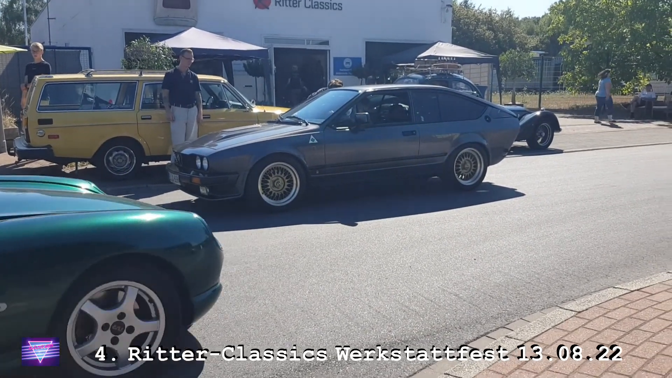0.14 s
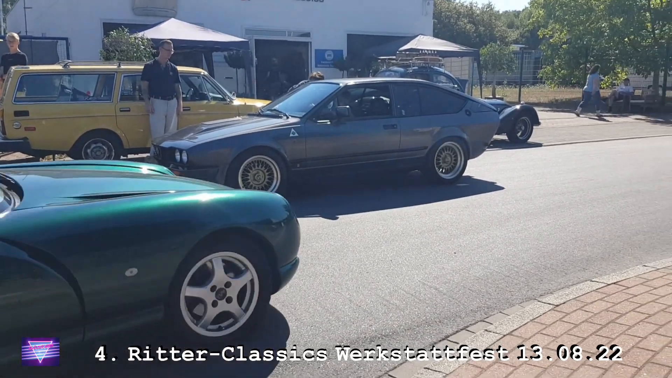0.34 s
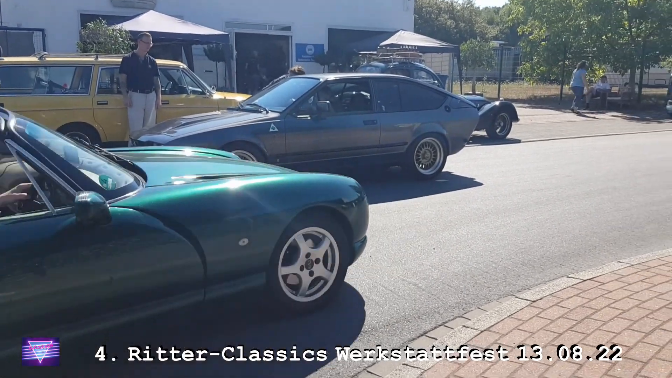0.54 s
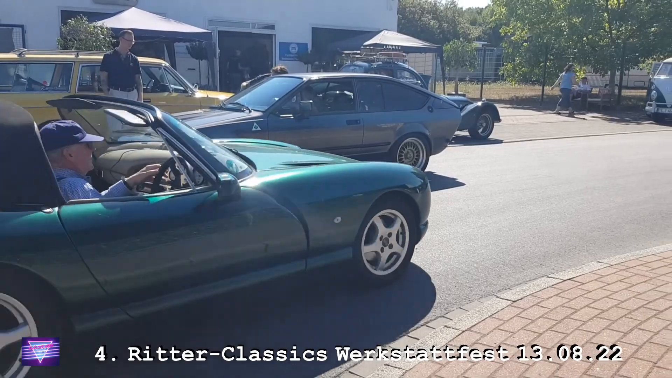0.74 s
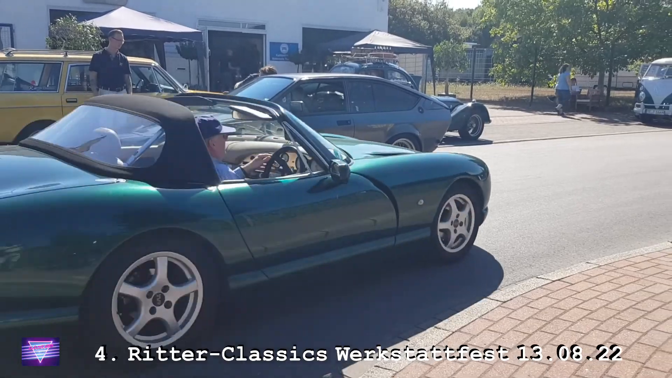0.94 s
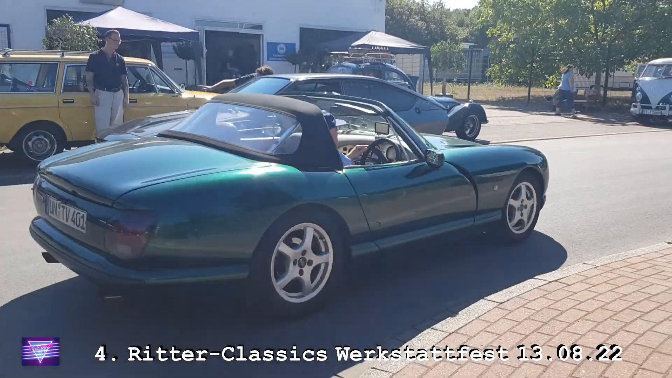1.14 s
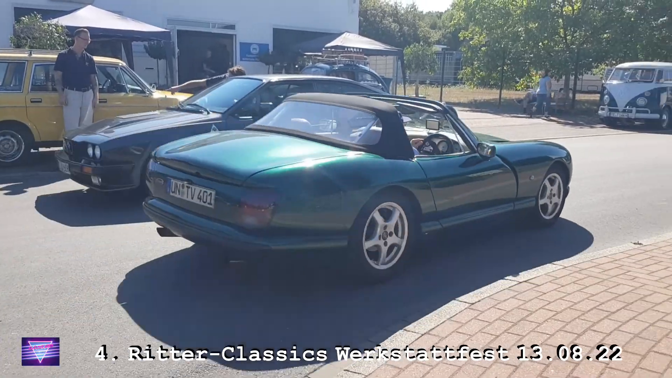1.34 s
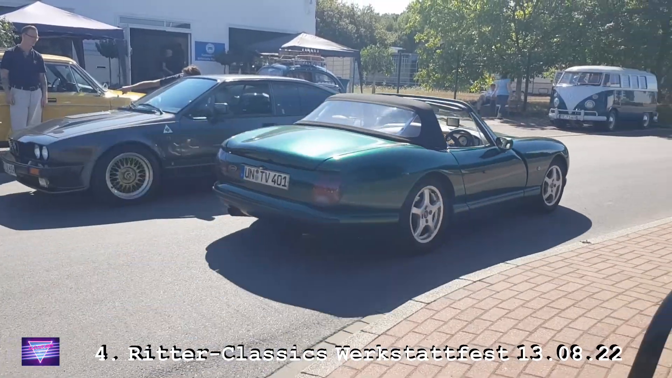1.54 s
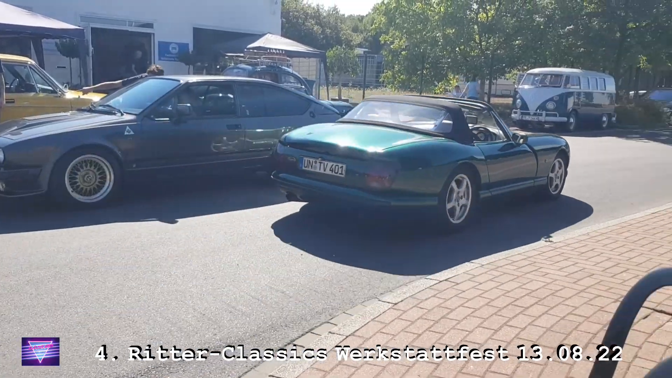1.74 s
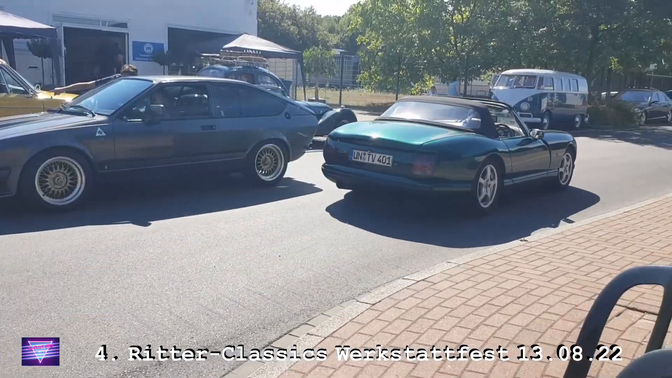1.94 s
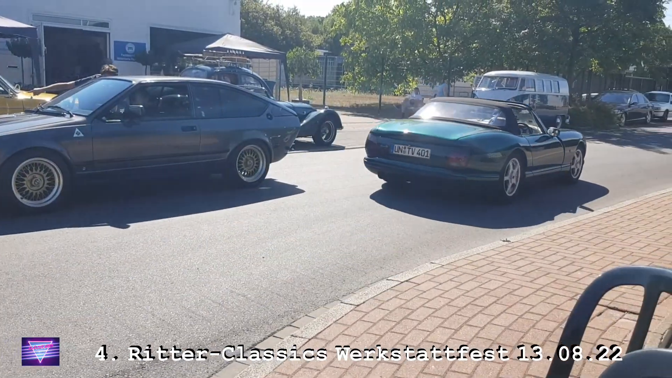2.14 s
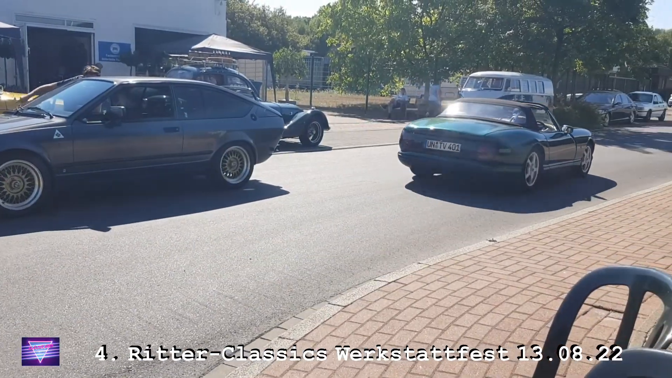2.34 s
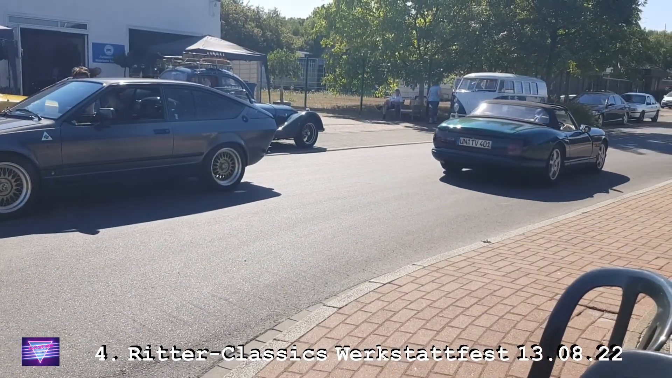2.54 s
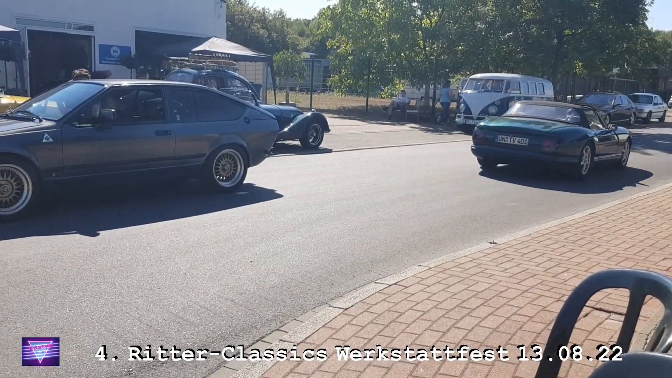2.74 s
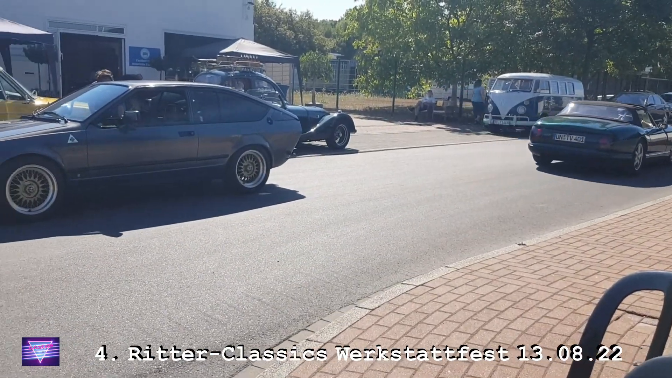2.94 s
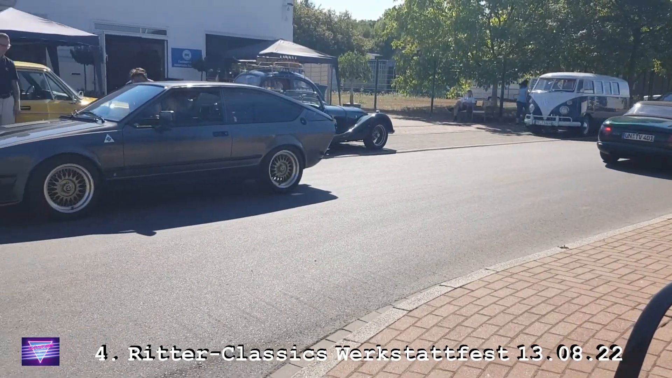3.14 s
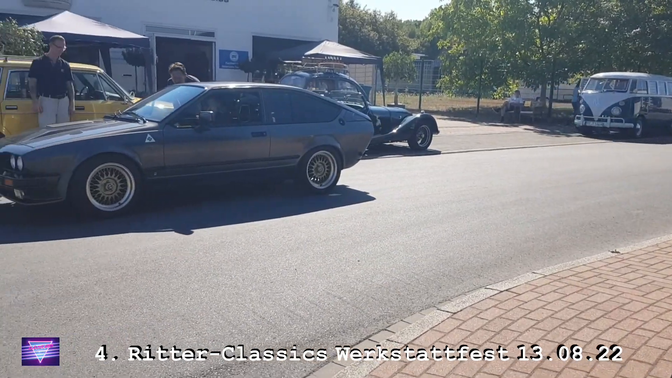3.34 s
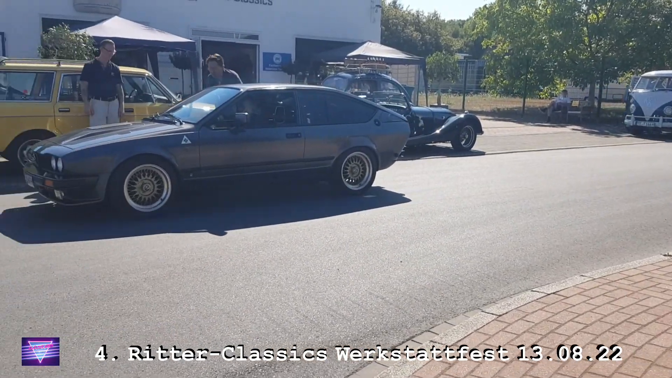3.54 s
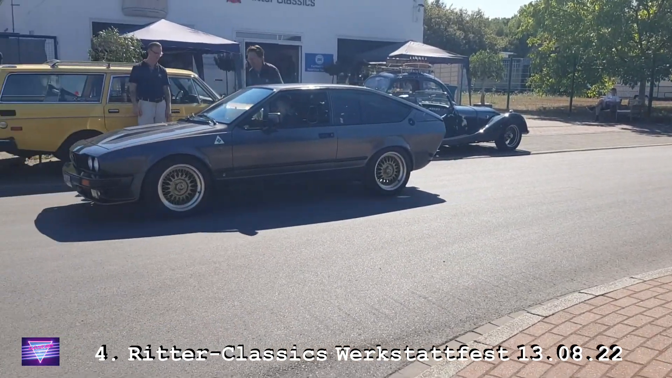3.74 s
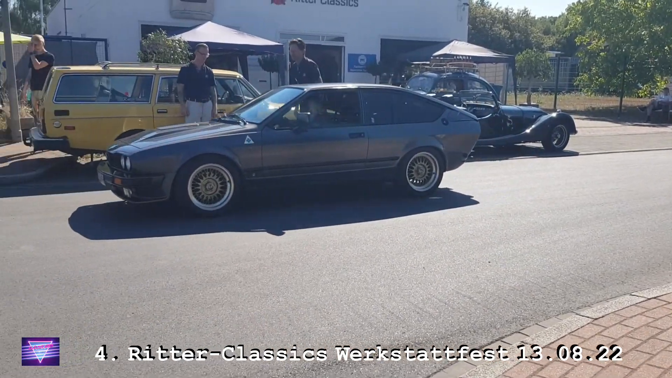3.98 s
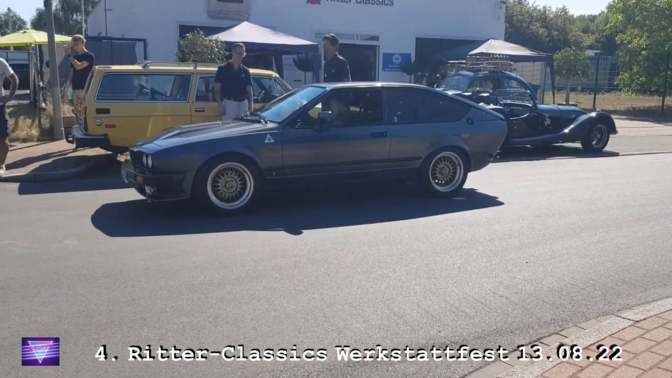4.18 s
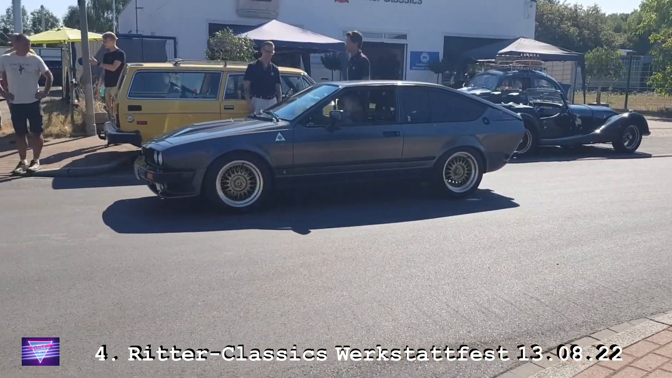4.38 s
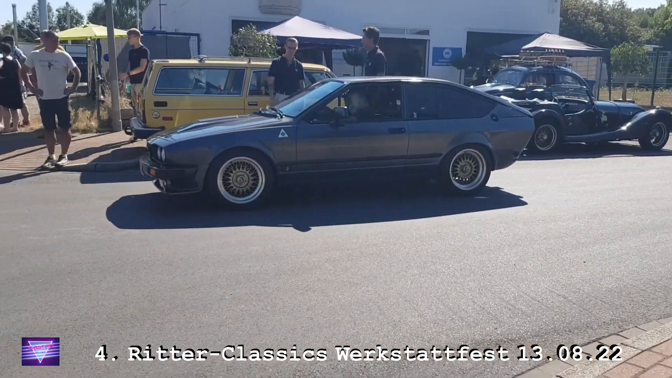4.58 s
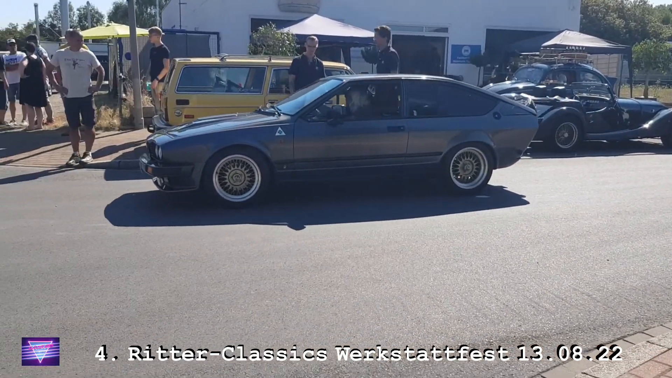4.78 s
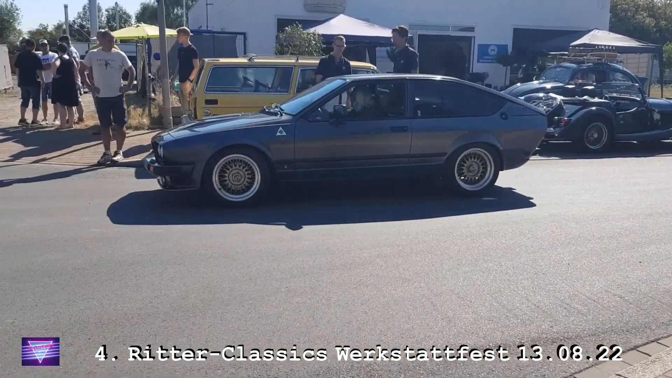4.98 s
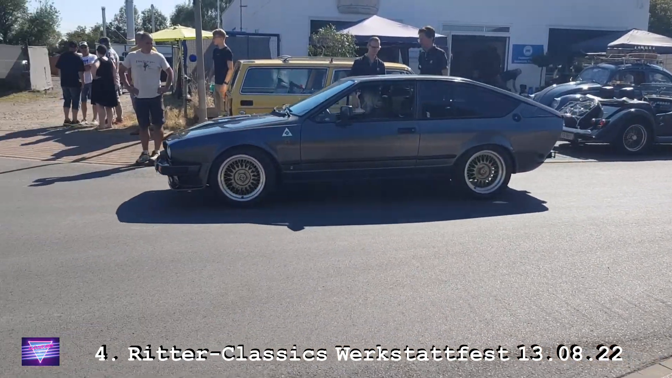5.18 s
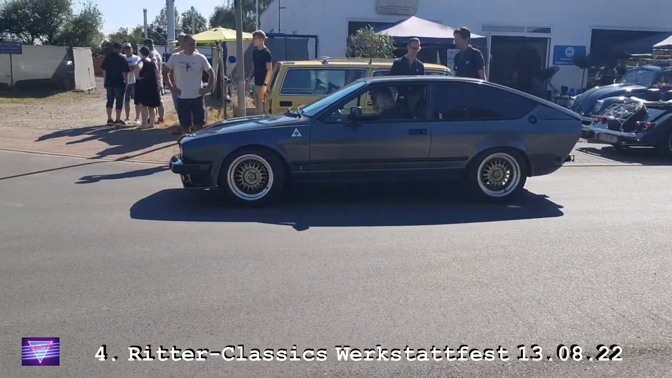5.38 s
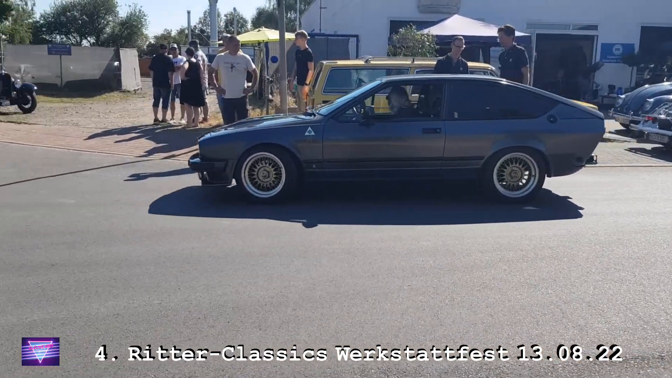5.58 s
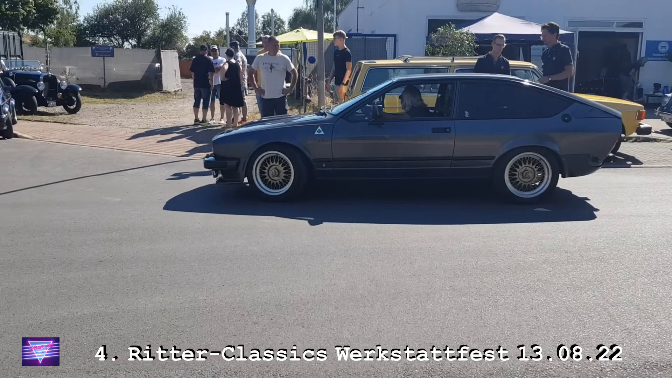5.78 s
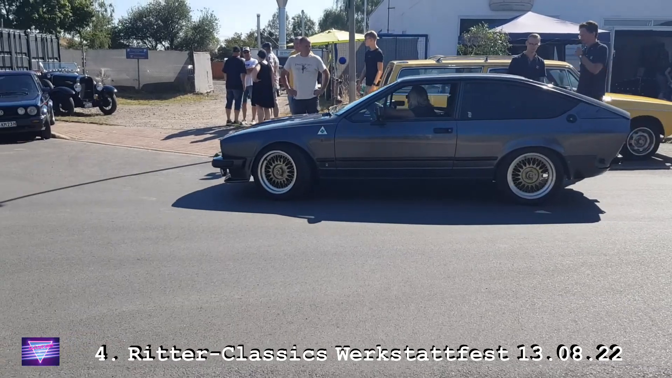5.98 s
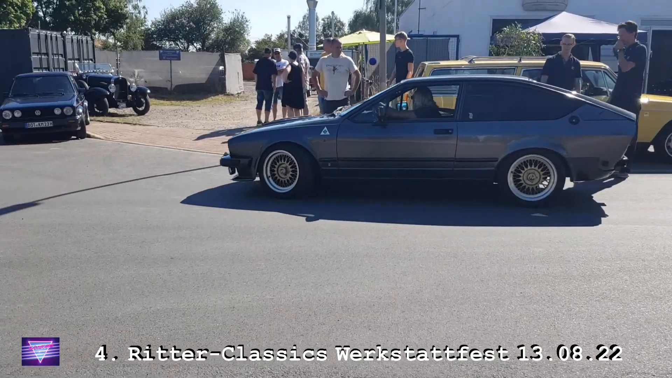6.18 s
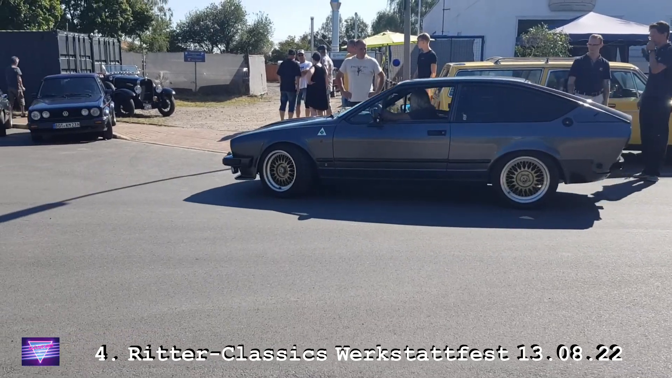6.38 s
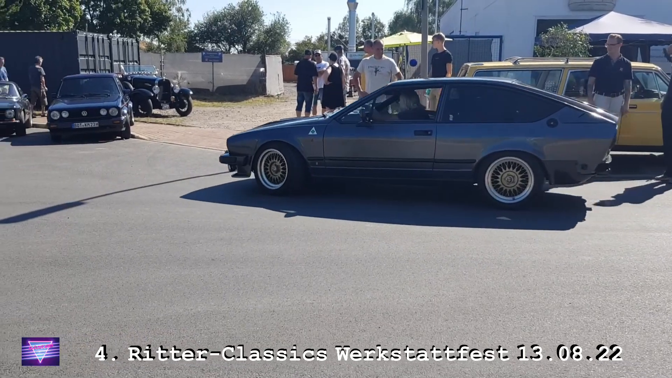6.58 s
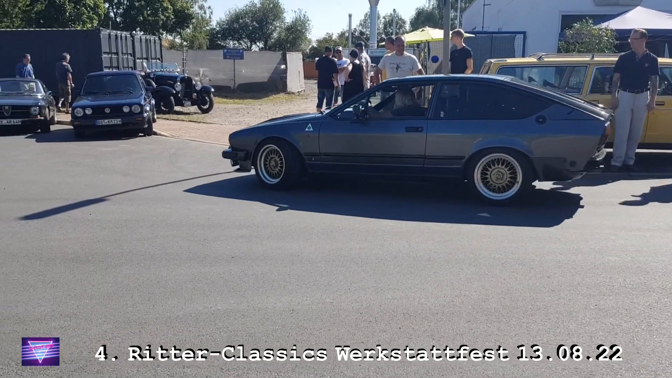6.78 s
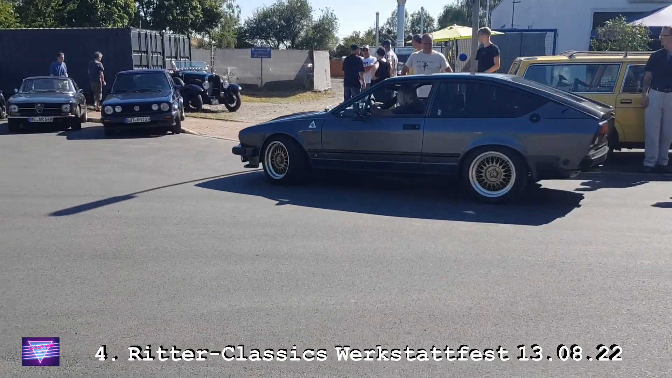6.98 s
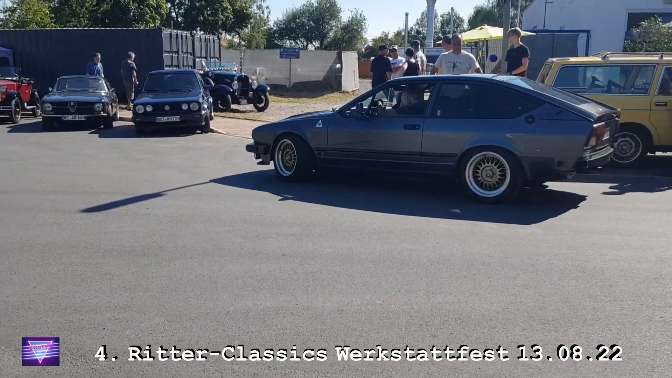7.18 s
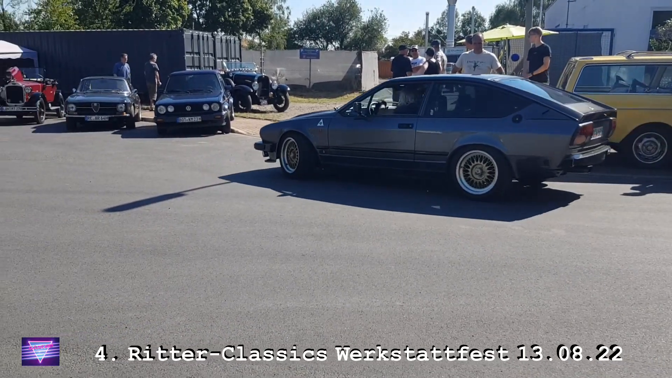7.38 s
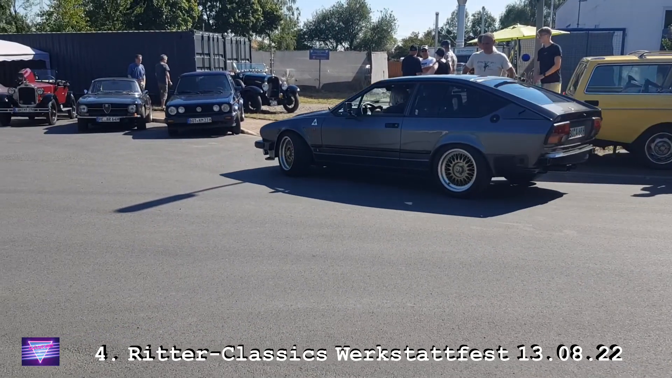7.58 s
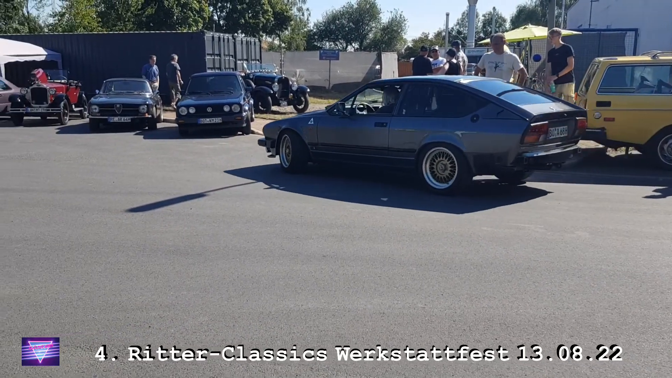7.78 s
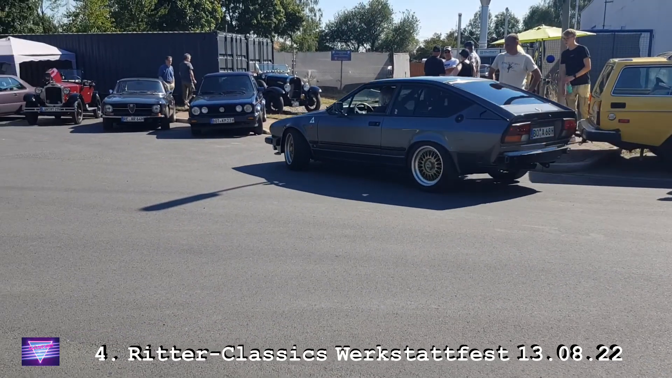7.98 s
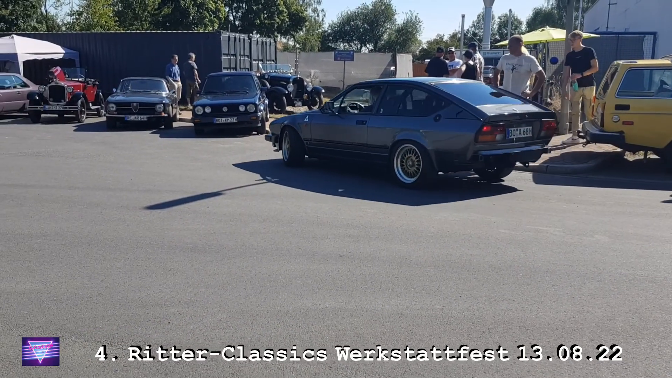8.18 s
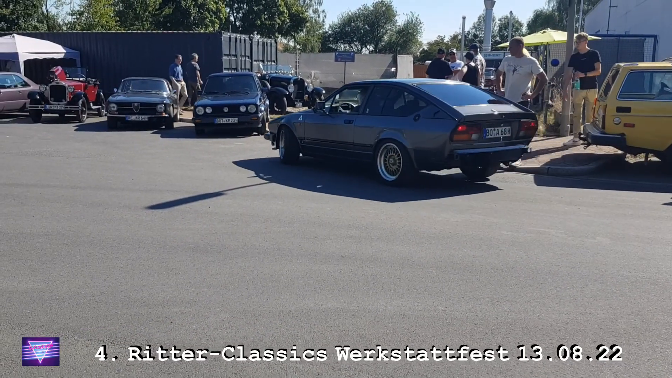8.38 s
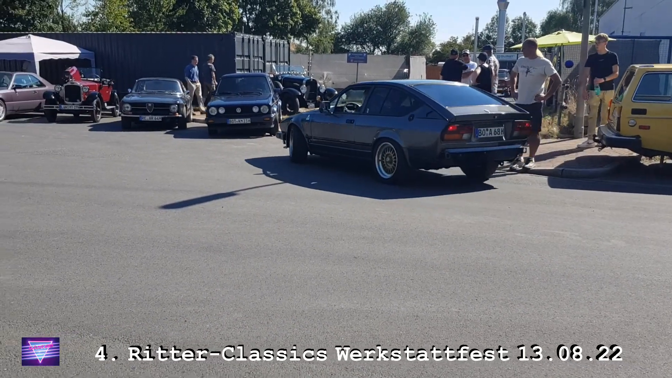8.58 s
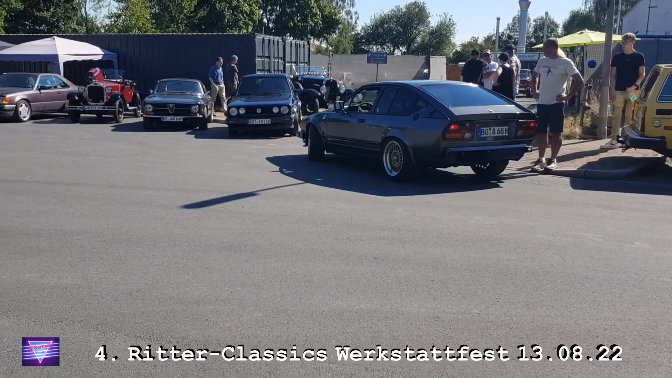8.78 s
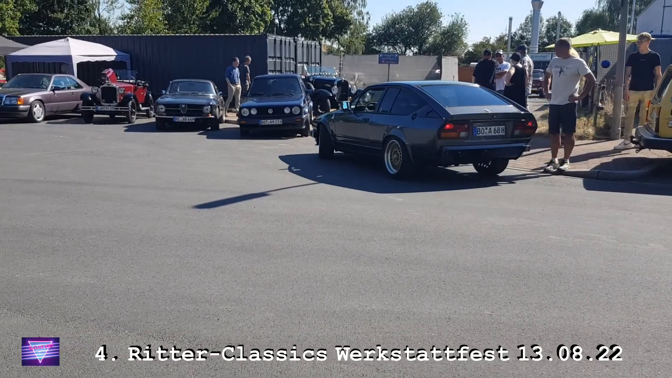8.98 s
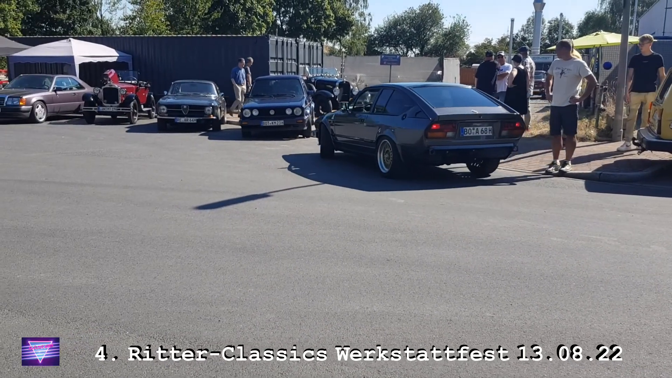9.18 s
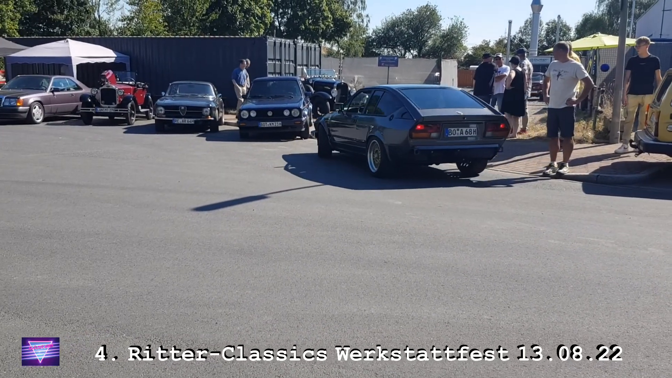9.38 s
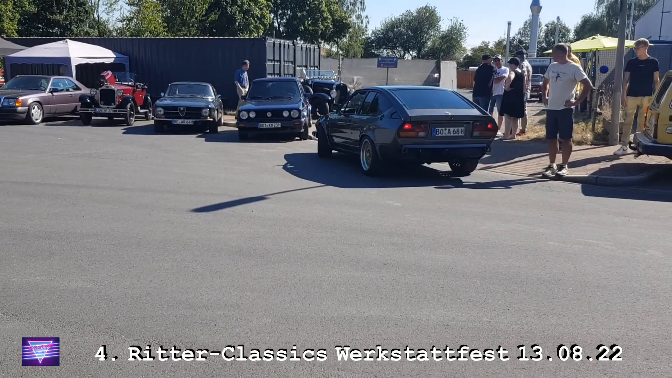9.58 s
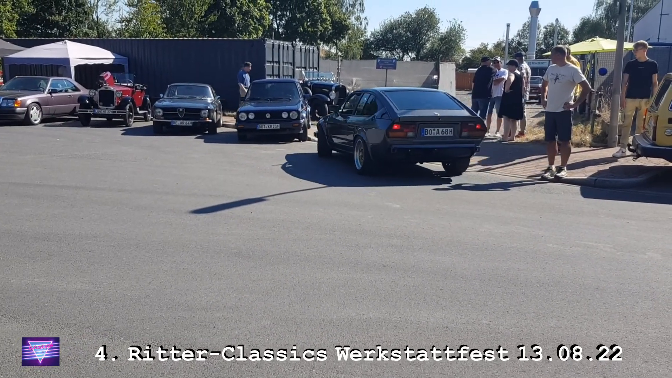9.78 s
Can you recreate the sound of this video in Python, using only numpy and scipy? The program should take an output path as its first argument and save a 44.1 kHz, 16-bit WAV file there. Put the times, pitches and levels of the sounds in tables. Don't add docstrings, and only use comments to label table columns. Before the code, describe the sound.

A lumpy eight-cylinder open roadster burbles past close by and drives off, then a six-cylinder coupe hums and ticks away over a paved yard.

```python
import sys
import numpy as np
from scipy import signal
from scipy.fft import rfft, irfft, next_fast_len
from scipy.io import wavfile
from scipy.ndimage import uniform_filter1d, map_coordinates

SR = 44100
rng = np.random.default_rng(int(sys.argv[2]) if len(sys.argv) > 2 else 0)


def decibels_to_gain(level_db):
    exponent = np.asarray(level_db, float) / 20
    return 10 ** exponent


def wav_record(signal):
    frames = np.transpose(np.atleast_2d(signal))
    bounded = np.clip(frames, -1, 1)
    quanta = np.round(bounded * 32767).astype(np.int16)
    wavfile.write(sys.argv[1], SR, quanta)


N = 433483
T = np.arange(N) / SR

# time_s, level_db
TICK = [(2, -63), (3, -65.5), (4, -66), (5, -66), (5.5, -62.5), (6.8, -62), (7.2, -69), (8, -68.5),
        (9.83, -83.5)]
# time_s, level_db
EXHAUST = [(0, -30), (.3, -28.5), (.6, -24.5), (1.2, -25), (1.5, -25), (1.95, -25.5), (2.25, -32.5),
           (2.7, -48)]


def unit(x):
    return x / np.sqrt(np.mean(x ** 2) + 1e-20)


def along(points, hz):
    f, v = np.transpose(points)
    return np.interp(np.log(hz + 1), np.log(f + 1), v)


def curves(rows):
    s, *cols = np.transpose(rows)
    return [np.interp(T, s, c) for c in cols]


def wobble(rate, at=T):
    coarse = T[::64]
    knots = rng.standard_normal(int(N * rate / SR) + 4)
    return np.interp(at, coarse, map_coordinates(knots, [coarse * rate]))


def bell(s, half):
    out = np.zeros(N)
    near = slice(max(0, round((s - 4 * half) * SR)), round((s + 4 * half) * SR))
    out[near] = np.exp(-((T[near] - s) / half) ** 2)
    return out


def swells(rows):
    return sum(decibels_to_gain(db) * bell(s, half) * np.sin(2 * np.pi * hz * (T - s)) for s, hz, db, half in rows)


def filtered(x, response):
    edge = SR // 8
    pads = [(0, 0)] * (x.ndim - 1) + [(edge, edge)]
    wide = np.pad(x, pads, mode="reflect", reflect_type="odd")
    m = next_fast_len(N + 3 * edge)
    return irfft(rfft(wide, m) * response(np.fft.rfftfreq(m, 1 / SR)), m)[..., edge:edge + N]


def rush(spectrum, patchy_db):
    # pitch_hz, likeness (0 to 1)
    alike = [(60, 1), (250, .97), (500, .88), (1000, .65), (2000, .45), (5000, .25), (12000, .05)]
    z = signal.stft(rng.standard_normal((2, N)), nperseg=512)[2]
    field = uniform_filter1d(rng.standard_normal(z.shape[1:]), size=6, axis=0)
    field = uniform_filter1d(field, size=12, axis=1)
    pair = signal.istft(z * decibels_to_gain(patchy_db * unit(field)), nperseg=512)[1][:, :N]

    def mid_side(hz):
        turn = np.arccos(np.clip(along(alike, hz), -1, 1)) / 2
        return decibels_to_gain(along(spectrum, hz)) * [np.cos(turn), np.sin(turn)]

    mid, side = filtered(pair, mid_side)
    return unit(np.array([mid + side, mid - side]))


def blows(firings, cylinders, pipe, scatter_db, jitter, even):
    at = np.flatnonzero(np.diff(np.floor(firings)) > 0)
    luck = np.clip(rng.standard_normal((2000, 2))[:len(at)], -1.6, 1.6)
    size = np.array(cylinders)[np.arange(len(at)) % len(cylinders)] * decibels_to_gain(scatter_db * luck[:, 0])
    size = size - (1 - even) * size.mean()
    at = np.clip(at + np.round(jitter * SR * luck[:, 1]).astype(int), 0, N - 1)
    x = filtered(np.bincount(at, size, N), lambda hz: decibels_to_gain(along(pipe, hz)))
    return x / np.sqrt(np.abs(uniform_filter1d(x ** 2, size=SR // 2)) + 1e-20)


def lines(turns, table, unsteady_db):
    def slow(v):
        return np.broadcast_to(v, N)[::8]

    low = 0
    for k, db in table:
        gain = np.sqrt(2) * decibels_to_gain(slow(db) + unsteady_db * wobble(7, slow(T)))
        low = low + gain * np.sin(2 * np.pi * (k * slow(turns) + rng.random()))
    return signal.resample_poly(low, up=8, down=1, padtype="line")[:N]


def gate(turns, sharp):
    return unit(uniform_filter1d(np.exp(-sharp * (turns % 1)), size=120))


def receding_db():
    closest_s, miss_m, speed_m_per_s = 0.25, 2.7, 3.92
    return -10 * np.log10(1 + (speed_m_per_s * (T - closest_s) / miss_m) ** 2)


def parked():
    four = [0.88, 0.69, 0.68, 0.48]
    # pitch_hz, level_db
    pipe = [(30, -30), (47, -9.5), (65, -3), (95, -13.5), (142, -7.5), (200, -27), (400, -83.5)]
    # time_s, level_db, half_length_s
    surges = [(1.445, -31.5, 0.23), (2.093, -25, 0.14), (2.354, -22.5, 0.089), (3.453, -40, 0.18),
              (4.162, -26, 0.13), (4.651, -30, .3), (5.519, -21, 0.083), (6.099, -29.5, 0.2),
              (6.549, -36.5, 0.16), (7.202, -28.5, 0.48), (7.963, -31, 0.26), (8.734, -30.5, 0.2),
              (9.4, -29, .22)]
    firings = np.cumsum(47.5 + 1.573 * wobble(1.5)) / SR
    idle_db = -45
    effort = decibels_to_gain(idle_db) + sum(decibels_to_gain(db) * bell(s, half) for s, db, half in surges)
    return effort * blows(firings, four, pipe, scatter_db=2.5, jitter=.0006, even=0.69)


def air(six, eight):
    # pitch_hz, level_db_per_hz
    rasp_tone = [(120, -31.5), (210, -1.5), (268, -2.5), (399, -18), (610, -17), (949, -25), (1040, -25),
                 (1210, -27), (1360, -26), (1660, -31), (2000, -33), (2600, -61), (4400, -120)]
    # pitch_hz, level_db
    bay_near = [(590, -11.5), (1000, -5.5), (1100, -6), (1260, -9), (1750, -2.5), (2190, -2), (2940, 0),
                (3990, -5), (4660, -4.5), (5650, -4), (8000, -14.5), (10400, -51.5), (17600, -120)]
    # pitch_hz, level_db
    bay_far = [(590, -28), (1000, -15.5), (1060, -2.5), (1200, -4.5), (1360, -5), (1750, -10), (2410, 0),
               (2700, -3), (3890, -7), (6330, -16.5), (8000, -19), (10400, -47), (17600, -120)]
    # pitch_hz, level_db
    fizz_tone = [(3530, -7.5), (6000, -28), (6570, -20), (8640, 2.5), (12100, 9), (15500, 0)]
    away_db, near_db = receding_db(), curves(TICK)[0] + 65
    first = np.interp(T, [1.7, 2.5], [1, 0])
    throb = first * (0.75 + 0.29 * gate(eight / 2, sharp=0.89))
    throb = throb + (1 - first) * (0.52 + 0.033 * gate(six, sharp=2.0))
    shared_db = 0.24 * wobble(5.9)

    bay = decibels_to_gain(-41.5 + 1.19 * away_db) * np.sqrt(first) * rush(bay_near, patchy_db=1.5)
    far_gain = np.hypot(decibels_to_gain(-57 + 0.28 * near_db), decibels_to_gain(-35.5 + 1.61 * away_db))
    bay = bay + far_gain * np.sqrt(1 - first) * rush(bay_far, patchy_db=1.5)
    fizz_gain = np.hypot(decibels_to_gain(-51.5 + 0.91 * away_db) * first, decibels_to_gain(-66.5 + .1 * near_db))
    fizz = fizz_gain * rush(fizz_tone, patchy_db=2.2)
    puff = np.hypot(decibels_to_gain(curves(EXHAUST)[0] - 13.5), decibels_to_gain(-38.0 + 0.36 * away_db))
    rasp = puff * decibels_to_gain(0.92 * wobble(8.0)) * rush(rasp_tone, patchy_db=1.0)
    return rasp + decibels_to_gain(shared_db) * throb * (bay + fizz)


def small_hits():
    # start_s, peak_db, ring_hz, t60_s
    knocks = [(3.736, -39, 700, 0.047), (5.5, -40.5, 515, 0.11), (6.486, -36, 660, 0.015),
              (7.389, -52.5, 674, 0.068), (9.094, -44.5, 700, 0.071)]
    # start_s, peak_db, brightness_db
    clicks = [(6.966, -36.5, -31), (7.199, -53, -29), (7.3442, -58, -10), (7.452, -49.5, -14),
              (7.5262, -39.5, -32), (7.6607, -47.5, -17.5), (7.7222, -39.5, -11), (7.8507, -53.5, -7),
              (8.07, -52, -7), (8.148, -44, -19), (8.357, -43.5, -11.5), (8.546, -44.5, -12.5),
              (8.6402, -48, -18), (8.762, -46.5, -10.5), (9.0204, -47, -14), (9.038, -45.5, -17.5),
              (9.267, -54.5, -4.5), (9.451, -51, -9.5), (9.634, -47, -11)]
    out, t = np.zeros((2, N + SR)), np.arange(SR // 10) / SR
    soft = 1 - np.exp(-t / 0.0009)

    def band(x, low_hz, high_hz):
        return signal.lfilter(*signal.butter(3, [low_hz, high_hz], "band", fs=SR), x)

    for s, db, hz, t60 in knocks:
        start = round(s * SR)
        ring = np.sin(2 * np.pi * hz * t) * decibels_to_gain(-60 * t / t60)
        puff = band(rng.standard_normal((2, len(t))), 400, 1500) * decibels_to_gain(-60 * t / .05)
        out[:, start:start + len(t)] += decibels_to_gain(db + 4.0) * soft * (0.72 * ring + 1.6 * puff)
    for s, db, bright_db in clicks:
        start = round(s * SR)
        grit = rng.standard_normal((2, 2, len(t))) * decibels_to_gain(-60 * t / .022)
        dull = np.clip(-bright_db / 16, .2, 2) * band(grit[0], 700, 3600)
        bright = decibels_to_gain(bright_db + 1) * band(grit[1], 5000, 14000)
        out[:, start:start + len(t)] += decibels_to_gain(db + 3.5) * (dull + bright)
    return out[:, :N]


def overrun_booms():
    # time_s, pitch_hz, level_db, half_length_s
    thumps = [(5.78, 67, -26, .1), (6.06, 65.8, -23.5, 0.11), (6.92, 85, -20, 0.028),
              (7.08, 65.2, -23, 0.13), (2.4, 300, -38, 0.053), (4.1, 293, -40, 0.038),
              (6.92, 282, -36.5, 0.032), (6.92, 138, -26, 0.023)]
    return swells(thumps)


def belt_chirps():
    # time_s, pitch_hz, level_db, half_length_s
    squeaks = [(.033, 5620, -33.5, 0.0053), (4.815, 5130, -66, 0.03), (4.8, 5880, -70, .025)]
    return swells(squeaks)


def coupe_exhaust(rate, firings):
    # time_s, throttle_db, misfiring_db
    drive = [(0, 2, -31), (.35, -4.5, -35.5), (1.05, -3, -36.5), (1.6, 2.5, -31), (2.1, 1, -21),
             (2.6, 1.5, -28.5), (3.9, 2, -35.5), (4.2, 0.5, -42), (4.85, 2, -39.5), (5.2, 0.5, -42.5),
             (5.6, -1.5, -33), (6.1, 1, -32), (6.9, -8, -39.5), (7.3, -4.5, -48), (7.75, -2, -37),
             (8.3, -1.5, -39.5), (9, -2, -40.5), (9.83, -0.5, -39)]
    # pitch_hz, level_db
    silencer = [(49, -47), (56, -35.5), (75, -22.5), (100, -23.5), (115, -35), (143, -25), (157, -22.5),
                (185, -47.5)]
    order_db = [1, 0.5, -1.5, -1.5]
    bite = [.5, .6, 1.2, 1.3]
    odd = [9, 15, 16, 17, 19, 20, 22, 23, 25, 26]
    six = [1.25, 0.61, 0.92, 0.8, 0.99, 0.63]
    # pitch_hz, level_db
    pipe = [(40, -27.5), (70, -9.5), (100, -15), (125, -5), (145, -1.5), (165, 5), (185, -3.5),
            (230, -22.5), (300, -33), (450, -45.5), (900, -77.5)]
    throttle_db, misfire_db = curves(drive)
    levels_db = [bite[k] * throttle_db + db + along(silencer, (k + 1) * rate) for k, db in enumerate(order_db)]
    revved_db = -49 + 0.55 * np.minimum(rate - 54, 0)
    low = lines(firings, [(2, levels_db[1])], unsteady_db=0.5)
    low = low + lines(firings, [(1, levels_db[0]), (3, levels_db[2]), (4, levels_db[3])], unsteady_db=1.0)
    low = low + lines(firings, [(5, revved_db)], unsteady_db=2.0)
    favoured = [(50, -46.5), (78, -36.0), (105, -59), (130, -44.5), (150, -35.5), (170, -45.5), (200, -55),
                (260, -68)]
    parts = [(k, 0.83 * throttle_db + along(favoured, k * rate / len(six))) for k in odd]
    low = low + lines(firings / len(six), parts, unsteady_db=3.5)
    return low + decibels_to_gain(misfire_db) * blows(firings, six, pipe, scatter_db=3.5, jitter=0.00038, even=0.022)


def valve_gear(valve):
    tappets = [3.5, 6, 5, 1, 1.5, -11.5]
    # pitch_hz, width_hz, level_db
    modes = [(570, 80, -63), (1065, 60, -64), (1360, 70, -68), (1650, 25, -74)]
    strength_db = np.array(tappets)[np.floor(valve).astype(int) % len(tappets)]
    tone = [(800, -36), (2000, -1.0), (3600, -1.0), (4600, -4.5), (5600, -15.0), (8000, -30), (11000, -13.0),
            (15000, -21)]
    tick_db = curves(TICK)[0] - 40 * (T < 2) + strength_db + 1.1 * wobble(30)
    tick = decibels_to_gain(tick_db) * gate(valve, sharp=1.4) * rush(tone, patchy_db=1.5)
    hum = 0
    for c, w, db in modes:
        ringing = filtered(rng.standard_normal(N), lambda f: w * w / (w * w + 4 * (f - c) ** 2))
        hum = hum + decibels_to_gain(db + 1.8 * wobble(2.5)) * unit(ringing)
    near = np.interp(T, [3.5, 5.4, 7.6, 9.83], [.3, 1.1, .9, .6])
    return tick + near * hum


def coupe():
    # time_s, firings_per_s
    revs = [(0, 37.2), (.2, 36.7), (1, 37.8), (1.5, 41.2), (2, 49.2), (2.2, 50.2), (3.9, 50.1), (4.3, 46.5),
            (4.65, 45.9), (5.15, 49), (5.55, 56.3), (6.25, 54.2), (6.84, 53.8), (7.1, 44.3), (7.65, 37),
            (8, 37.2), (8.4, 39.1), (9.7, 37)]
    rate, = curves(revs)
    firings = np.cumsum(rate * (1 + 0.0023 * wobble(11))) / SR
    valve = firings - firings[round(6.152 * SR)]
    return coupe_exhaust(rate, firings), valve_gear(valve), valve


def roadster():
    # time_s, firings_per_s
    speed = [(0, 94.1), (.45, 91.1), (.75, 88.9), (1.15, 88), (1.35, 89.9), (1.5, 94), (2.1, 106.3),
             (2.45, 105.4), (2.7, 102.4)]
    cylinders = [1.3, 0.24, 0.85, 0.49, 0.53, 1, 1.7, 0.53]
    # multiple, level_db within the group
    lumps = [(10, -15), (11, -20), (13, -8), (14, -6), (15, -8), (16, -2), (17, -14), (18, -17)]
    # multiple, level_db within the group
    upper = [(19, -14), (20, -11), (21, -11), (22, -12), (23, -4), (24, -9), (25, -10), (26, -11),
             (27, -13), (28, -20), (29, -19), (31, -19), (32, -13)]
    # pitch_hz, level_db
    tailpipe = [(300, -52), (400, -12), (460, 8), (530, -12.5), (610, 0.5), (690, -33), (780, -1.5),
                (900, -15.5), (1300, -51.5)]
    (rate,), (lump_db,) = curves(speed), curves(EXHAUST)
    firings = np.cumsum(rate) / SR
    cycle = firings / len(cylinders)
    upper_db = -34.5 + 1.3 * receding_db() - np.interp(T, [.9, 1.4], [0, 4])
    low = decibels_to_gain(lump_db) * lines(cycle, lumps, unsteady_db=-0.5)
    low = low + decibels_to_gain(upper_db) * lines(cycle, upper, unsteady_db=1.8)
    firing_line = lines(firings, [(0.99, lump_db + 0.5)], unsteady_db=-1.0)
    low = low + np.interp(T, [2.2, 2.45], [1, 0]) * firing_line
    facing_db = np.interp(T, [0, .4, .9, 1.3, 2.1, 2.5, 3.5], [-46, -52.0, -54, -44.5, -48.5, -65, -65.0])
    rasp = decibels_to_gain(facing_db) * blows(firings, cylinders, tailpipe, scatter_db=2.0, jitter=0.00027, even=0.46)
    return np.interp(T, [2.7, 3.8], [1, 0]) * low + rasp, firings


def scene():
    six_low, six_high, six = coupe()
    eight_low, eight = roadster()
    low = parked() + overrun_booms() + six_low + eight_low
    return low + air(six, eight) + small_hits() + belt_chirps() + six_high


def roll_off(x):
    return signal.sosfilt(signal.butter(12, 15640, fs=SR, output="sos"), x)


def record(dry):
    # pitch_hz, level_db
    colour = [(60, 1.5), (120, 0.7), (240, -0.6), (480, -3), (950, -5.8), (1890, -11.5), (3770, -12.5),
              (7520, -11.0), (15000, -9.5)]
    # pitch_hz, lead_radians
    lead = [(30, -0.22), (150, -0.53), (300, -0.72), (700, -0.5), (1200, 0)]
    # time_s, lag_samples
    turning = [(0, -9), (1, 0), (2.1, 5), (2.6, -10), (4, -4), (6, 0), (9.83, 3)]
    half = np.array([[.5], [-.5]])
    ports = filtered(dry, lambda hz: decibels_to_gain(half * along(colour, hz)) * np.exp(1j * half * along(lead, hz)))
    lag, at = curves(turning)[0], np.arange(N)
    late = [map_coordinates(port, [at - side * lag], mode="nearest") for port, side in zip(ports, half)]
    return roll_off(np.array(late))


dry = scene()
out = record(dry)
wav_record(out)
```